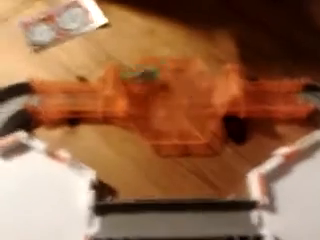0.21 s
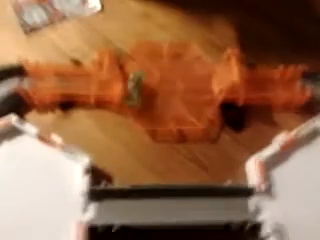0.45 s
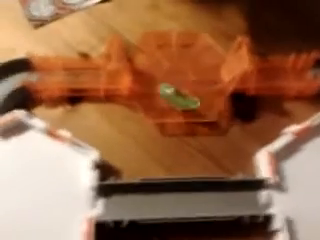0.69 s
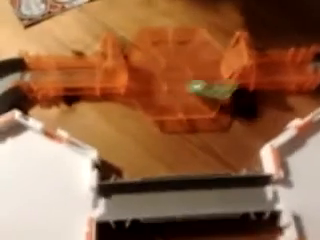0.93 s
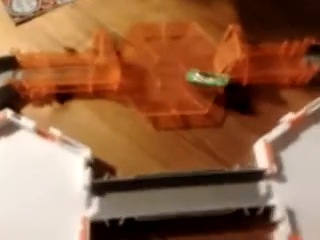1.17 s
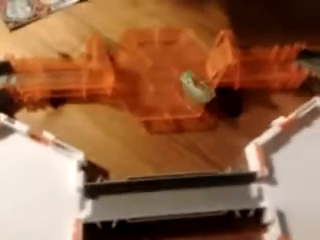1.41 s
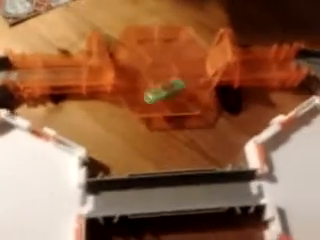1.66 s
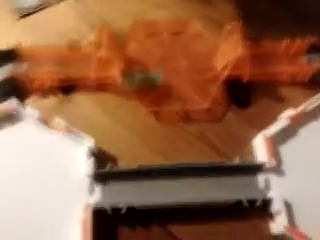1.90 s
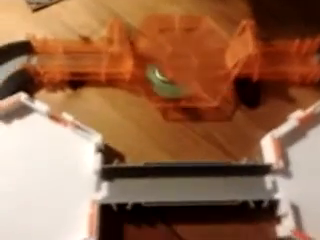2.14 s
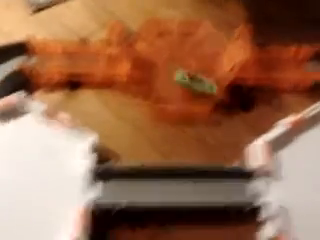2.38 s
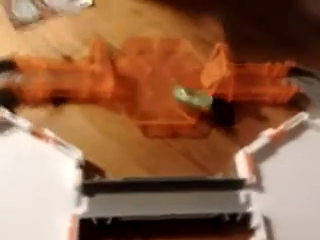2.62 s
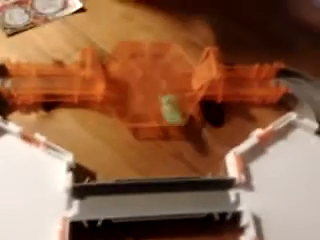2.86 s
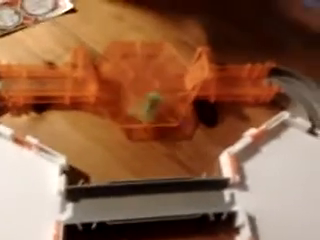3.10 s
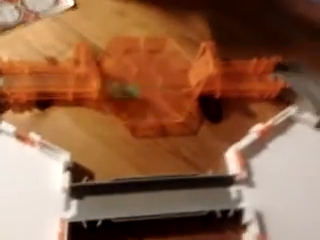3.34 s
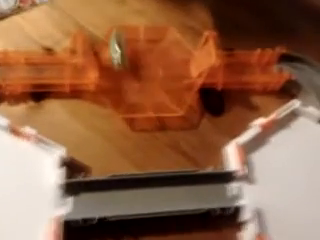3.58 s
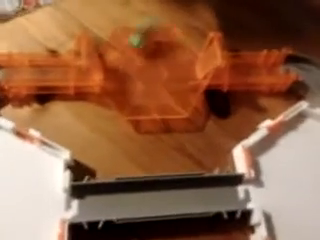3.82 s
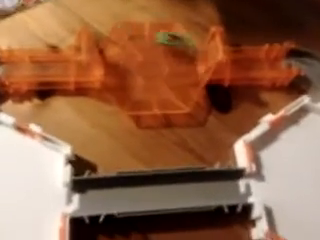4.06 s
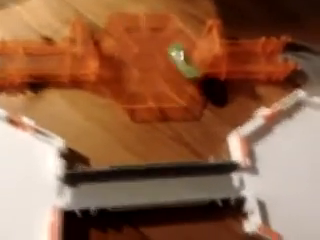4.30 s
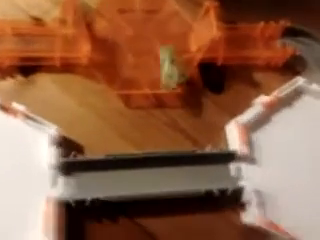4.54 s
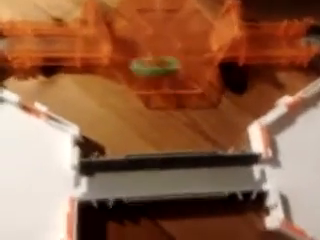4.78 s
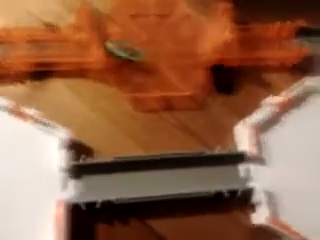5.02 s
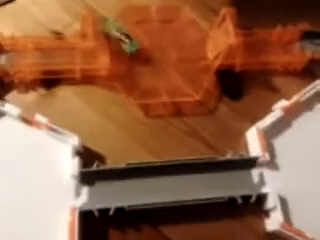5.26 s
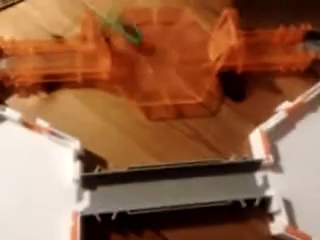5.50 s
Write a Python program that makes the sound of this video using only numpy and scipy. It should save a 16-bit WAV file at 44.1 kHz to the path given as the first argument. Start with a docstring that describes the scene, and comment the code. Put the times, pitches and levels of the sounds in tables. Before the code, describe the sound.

A tiny vibrating toy scurries in a hollow plastic arena on a wooden floor, heard close on a hand-held microphone with limited treble in a small room. A wavering low buzz near 130 Hz, a thin whirr and soft background noise run throughout. Above them, legs patter, tick and scrape irregularly with many dull plastic knocks. Sharp loud clacks land at 0.2, 0.4 and 0.58 s. From 1.0 to 1.7 s knocks crowd together, with a bright clack at 1.53. A faint dull handling rumble swells at 1.9. Lighter chatter follows, then a busy flurry at 2.75-3.0 and clacks near 2.66, 3.5 and 3.93. The hardest double crack comes at 4.42-4.46, followed by sparser pattering and clacks at 5.11, 5.31 and 5.46. Faint low hums come and go behind. The buzz is still running at the end, about 5.6 s.

```python
"""A small vibrating toy robot skitters around a plastic arena on a wooden floor, in a small room.
Its motor turns an uneven weight that drones through floor resonances; noisy contact forces make the legs
patter and scuff, and taps through a plastic filter make the body bump the panel and clack against walls.
Filtered noise gives a thin whirr and a steady background; faint hums come and go behind, and the hand-held
microphone is nudged once with a dull rumble."""
import sys
import numpy as np
from scipy import signal
from scipy.fft import rfft, irfft, next_fast_len
from scipy.io import wavfile
from scipy.ndimage import map_coordinates

SR = 44100
rng = np.random.default_rng(int(sys.argv[2]) if len(sys.argv) > 2 else 0)


def bounce(signal):
    """Save signal as a 16-bit WAV file at the path given by the first command-line argument."""
    frames = np.transpose(np.atleast_2d(signal))
    limited = np.clip(frames, -1, 1)
    pcm = np.round(limited * 32767).astype(np.int16)
    wavfile.write(sys.argv[1], SR, pcm)


N = 248283
T = np.arange(N) / SR  # time axis, s


def amp(db):
    """Decibels to gain."""
    return 10 ** (np.asarray(db) / 20)


def unit(x):
    """Scale to rms 1."""
    return x / np.sqrt(np.mean(x ** 2) + 1e-20)


def along(points, hz):
    """Read (Hz, value) points on a log frequency axis."""
    f, v = np.transpose(points)
    return np.interp(np.log(hz + 1), np.log(f + 1), v)


def curve(rows):
    """One value per sample from (s, value) rows."""
    return np.interp(T, *np.transpose(rows))


def wobble(rate):
    """A smooth random curve, rate knots a second."""
    return map_coordinates(rng.standard_normal(int(N * rate / SR) + 4), [T * rate])


def filtered(x, response):
    """Filter x by a response of frequency."""
    m = next_fast_len(len(x) + SR // 2)
    spectrum = rfft(x, m) * response(np.fft.rfftfreq(m, 1 / SR))
    return irfft(spectrum, m)[:len(x)]


def add(out, s, sound):
    """Mix a sound in at s seconds."""
    part = out[round(s * SR):][:len(sound)]
    part += sound[:len(part)]


def peak(hz, centre, width):
    """Shape of one resonance, 1 at its centre."""
    return 1 / (1 + (2 * (hz - centre) / width) ** 2)


# broad colour of the plastic arena under a tap: f/Hz, relative level/dB
ARENA_COLOUR = [(60, -29), (200, -20), (720, -14), (860, -3.5), (1000, -1.5), (1250, -6.5), (1650, 2),
                (2000, 4), (2200, -5.5), (2800, -5), (3100, -13), (3900, -21), (4900, -24.5), (6800, -23.5),
                (7300, -24)]
# narrow resonances of its panels: f/Hz, width/Hz, lift/dB
PANEL_PEAKS = [(982, 60, 4.5), (1780, 39, 1.5), (2468, 26, 8), (3415, 210, 8.5), (3740, 52, 8),
               (4250, 200, 8)]


def plastic(thump_db, snap_db, notes, size=4096):
    """The arena's causal ring after one tap: flat blows thump, hard corners snap, each spot has its note."""
    hz = np.fft.rfftfreq(size, 1 / SR)
    db = along(ARENA_COLOUR, hz)
    db = db + sum(lift * peak(hz, f, width) for f, width, lift in PANEL_PEAKS + notes)
    tilt = [(500, .5 * thump_db), (1000, thump_db), (1800, 0), (3400, 0.17 * snap_db), (6000, 1.57 * snap_db)]
    db = db + along(tilt, hz)
    # fold the cepstrum forward for minimum phase, so the ring starts at the tap
    cepstrum = irfft(np.log(amp(db)))
    cepstrum[1:size // 2] *= 2
    cepstrum[size // 2 + 1:] = 0
    return irfft(np.exp(rfft(cepstrum)))


def shudder(t, crunch_db, crunch_t60, rattle_db, rattle_t60):
    """Force of one contact: a blow, a brief crunch, then the arena's loose joints rattle on."""
    crunch = amp(crunch_db - 60 * t / crunch_t60)
    rattle = amp(rattle_db - 60 * t / rattle_t60)
    force = rng.standard_normal(len(t)) * (crunch + rattle)
    force[0] += 1
    return force


def grains(size, per_s):
    """Force of many tiny separate contacts of unequal weight, rms 1."""
    weights = np.tanh(2 * rng.standard_normal(size))
    return unit(weights * (rng.random(size) < per_s / SR))


MOTOR_HZ, MOTOR_WAVER = 128.7, .05  # middle speed in turns a second, spread of its drift as a share


def motor(speed_hz, waver):
    """Running count of turns of the eccentric weight, whose speed drifts at random."""
    return np.cumsum(speed_hz * np.exp(waver * wobble(14))) / SR


def landings(turns, scatter, uneven_db, rattle_db):
    """Force of the robot's landings: one a turn, a little early or late (scatter in s) and of its own weight."""
    hops = np.flatnonzero(np.diff(np.floor(turns)))
    late, weight, side = rng.standard_normal((len(hops), 3)).T
    when = np.clip(hops + scatter * SR * late, 0, N - 1).astype(int)
    sizes = amp(uneven_db * np.minimum(weight, 1)) * np.sign(side)
    out = np.zeros(N + SR)
    t = np.arange(SR // 25) / SR
    for i, size in zip(when, sizes):
        out[i:i + len(t)] += size * shudder(t, -16, .009, rattle_db, .04)
    return out[:N]


# floor and arena resonances that the motor shakes: f/Hz, width/Hz, relative level/dB
BOARD_MODES = [(130.3, 11.8, -0.5), (183.8, 9.7, 1.5), (233.8, 21.3, 0), (358, 28, -3.5), (401, 22, -5.5),
               (474, 38, -5.5)]
# level of the low drone over time, before DRONE_GAIN_DB: t/s, level/dB
DRONE_LEVEL = [(0.0, -48), (1.02, -53), (1.05, -49.5), (1.91, -51.5), (1.93, -48), (2.26, -50), (4.19, -48),
               (4.22, -52), (5.63, -52.5)]
DRONE_GAIN_DB = -0.5


def drone(turns):
    """The weight and the uneven landings shake the low resonances of floor and arena."""
    shake = landings(turns, scatter=0.00087, uneven_db=5.5, rattle_db=-26.5)

    def boards(f):
        """Sum of band-pass resonances with alternating polarity."""
        return sum((-1) ** k * amp(db) * 1j * f * w / (c * c - f * f + 1j * f * w)
                   for k, (c, w, db) in enumerate(BOARD_MODES))

    rumble = amp(-3.5) * unit(filtered(shake, boards))
    tone = amp(-23) * np.sin(2 * np.pi * turns)
    return amp(curve(DRONE_LEVEL) + DRONE_GAIN_DB) * (rumble + tone)


# how hard the robot patters, before PATTER_GAIN_DB; higher where it is caught in a corner: t/s, level/dB
PATTER_LEVEL = [(0.0, -41), (0.27, -51), (0.5, -46), (0.8, -52), (0.95, -50.5), (1.1, -45.5), (1.54, -49.5),
                (1.9, -47), (2.14, -43), (2.39, -46), (2.74, -46.5), (2.9, -42), (3.2, -43), (3.62, -52),
                (3.89, -47), (4.17, -40.5), (4.34, -51.5), (4.66, -52), (4.9, -47), (5.31, -50),
                (5.63, -54)]
PATTER_GAIN_DB, PATTER_SWAY_DB, SWAYS_PER_S = -4, 1, 14  # the gait is never steady
UPSET_DB, UPSET_MOST_DB = -13.5, -39.5  # extra hopping after a blow: level relative to it, upper limit
SETTLE_S = 0.046  # time constant of calming down


def agitation(hits):
    """Strength of the hopping: a swaying gait, stirred up by every blow and settling again."""
    sway_db = PATTER_SWAY_DB * np.tanh(wobble(SWAYS_PER_S))
    power = amp(curve(PATTER_LEVEL) + PATTER_GAIN_DB + sway_db) ** 2
    settling = np.exp(-T[:SR // 3] / SETTLE_S)
    for s, db in hits:
        add(power, s, (amp(min(db + UPSET_DB, UPSET_MOST_DB)) * settling) ** 2)
    return np.sqrt(power)


HOP_REBOUND_DB = 2.5  # second leg, relative to the first


def hop_force(t):
    """One leg lands, and a second follows within a few milliseconds."""
    force = shudder(t, crunch_db=-17, crunch_t60=0.02, rattle_db=-24, rattle_t60=0.05)
    force[int(rng.uniform(.002, .005) * SR)] += amp(HOP_REBOUND_DB)
    return force


HOP_SHARE, HOP_UNEVEN_DB = 0.36, 2.5  # chance that a turn ends in a real hop, largest lift or cut of its weight
HOP_NOTE_HZ, HOP_NOTE_SPREAD = 1783, 0.36  # middle note of the struck spots, log-frequency spread
HOP_NOTE_WIDTH_HZ, HOP_NOTE_DB = 170, 12.5
EDGE_HZ, EDGE_WIDTH_HZ = 4300, 1300  # hard plastic edge, shared by legs and bumps
BUZZ_DB = -4  # light drumming of the legs, relative to the hops


def patter(turns, hits):
    """The robot hops on some turns, each on a spot with its own note, over a light drumming of the legs."""
    starts = np.flatnonzero(np.diff(np.floor(turns))) / SR
    chance = rng.random(len(starts))
    traits = rng.standard_normal((len(starts), 4))
    hops = np.zeros(N)
    for s, luck, (late, weight, spot, thump) in zip(starts, chance, traits):
        if luck >= HOP_SHARE:
            continue
        note = (HOP_NOTE_HZ * np.exp(HOP_NOTE_SPREAD * spot), HOP_NOTE_WIDTH_HZ, HOP_NOTE_DB)
        ring = plastic(3.8 + 3 * thump, -7.5, [note, (EDGE_HZ, EDGE_WIDTH_HZ, 3)], size=1024)
        force = hop_force(np.arange(SR // 40) / SR)
        hop = unit(signal.fftconvolve(force, ring))
        add(hops, abs(s + .001 * late), amp(HOP_UNEVEN_DB * np.tanh(weight)) * hop)
    legs = landings(turns, scatter=0.001, uneven_db=3, rattle_db=-17)
    ring = plastic(thump_db=7.5, snap_db=-9, notes=[(EDGE_HZ, EDGE_WIDTH_HZ, 4)])
    buzz = signal.fftconvolve(legs, ring)[:N]
    return agitation(hits) * (unit(hops) + amp(BUZZ_DB) * unit(buzz))


# bright colour of the scuffing legs, also lent to the whirr: f/Hz, relative level/dB
LEG_COLOUR = [(1500, -16.5), (2600, 2), (4200, 1.5), (5300, -4.5), (6800, -0.5), (7400, -5.5)]


def leg_colour(force):
    """Noise through the bright band of the legs, rms 1."""
    return unit(filtered(force, lambda hz: amp(along(LEG_COLOUR, hz))))


# a leg or the nose catches and scrapes along the plastic: t/s, level/dB
SCRAPE_STROKES = [(0.302, -46), (0.475, -42), (1.21, -43), (1.257, -45.5), (1.359, -48), (1.412, -49),
                  (1.641, -40), (1.979, -56), (2.056, -47), (2.599, -46.5), (2.652, -52), (2.709, -48),
                  (3.039, -41.5), (3.493, -55), (3.983, -40), (4.037, -41), (4.111, -42.5), (4.3, -43.5),
                  (4.9, -62), (4.999, -44), (5.098, -55), (5.165, -47.5)]
SCRAPE_RISE_S, SCRAPE_FALL_S = 0.0087, 0.0097
SCUFF_DB, SCUFF_FOLLOWS = -55.5, 0.99  # level at average patter, dB per dB of patter
SCUFF_ROUGH_DB, SCUFF_CATCHES_PER_S = 9, 320  # the legs grip and slip at an uneven pace
SLIDE_DB, SLIDE_MOST_DB = -11.5, -38.5  # slide along the wall: level relative to its blow, upper limit


def scuff(effort_db, hits, before=0.0047, after=0.0071):
    """Legs tick and scrape in short bright spurts; the body slides just before and after each knock."""
    catch_db = 3.5 * np.tanh(1.3 * wobble(45))
    spurts = amp(SCUFF_DB + SCUFF_FOLLOWS * effort_db) * unit(amp(catch_db))
    strokes = [(s, min(db + SLIDE_DB, SLIDE_MOST_DB), before, after) for s, db in hits]
    strokes += [(s, db, SCRAPE_RISE_S, SCRAPE_FALL_S) for s, db in SCRAPE_STROKES]
    slides = np.zeros(N)
    for s, db, rise, fall in strokes:
        span = slice(max(0, int((s - .05) * SR)), int((s + .06) * SR))
        t = T[span] - s
        slides[span] += amp(db) * np.exp(-(t / np.where(t < 0, rise, fall)) ** 2)
    roughness = amp(SCUFF_ROUGH_DB * np.tanh(wobble(SCUFF_CATCHES_PER_S)))
    ticks = grains(N, per_s=3400) * roughness
    return spurts * leg_colour(ticks) + slides * leg_colour(grains(N, per_s=2500))


def whirr():
    """The motor's brushes hiss thinly and evenly under everything."""
    return amp(-62.5) * leg_colour(rng.standard_normal(N))


# colour of the steady background noise: f/Hz, relative level/dB
NOISE_COLOUR = [(15, -33), (25, -20), (71, -13), (211, -20.5), (627, -12), (984, -12.5), (1250, -12.5),
                (1960, -21.5), (2310, -17.5), (2480, -29), (7200, -60), (9360, -35.5), (15800, -120)]


def background_noise():
    """Steady background noise, shaped by its spectrum."""
    return amp(-56.0) * unit(filtered(rng.standard_normal(N), lambda hz: amp(along(NOISE_COLOUR, hz))))


def blow(db, rebound_db, ring, rattle_db, linger_db, low_hz=3800):
    """The body hits the plastic and rebounds a few milliseconds later; db is the level of the first 10 ms."""
    t = np.arange(SR // 6) / SR
    force = shudder(t, crunch_db=-19, crunch_t60=0.01, rattle_db=rattle_db, rattle_t60=0.051)
    rebound = shudder(t, crunch_db=-25, crunch_t60=0.01, rattle_db=-22, rattle_t60=0.045)
    lag = int(rng.uniform(0.0038, .0048) * SR)
    force[lag:] += 2 * amp(rebound_db) * rebound[:-lag]
    # the whole arena goes on rattling, with softened treble
    loose = signal.lfilter(*signal.butter(2, low_hz, fs=SR), grains(len(t), per_s=470))
    force += loose * amp(linger_db - 60 * t / 0.18)
    sound = signal.fftconvolve(force, ring)
    return amp(db) * sound / np.std(sound[:SR // 100])


# bumps on the arena's flat panel: t/s, level/dB, panel thump at 1 kHz/dB, hard plastic edge/dB
BUMP_HITS = [(0.041, -29.5, 4, 5.5), (0.135, -46, 0, 2), (0.216, -34.5, -3, -4), (0.409, -28.5, -1.5, 2.5),
             (0.516, -36.5, -7.5, 2), (0.542, -36, 6.5, -6), (0.6, -34.5, 16.5, -5),
             (0.626, -39.5, 6.5, -1), (0.638, -36.5, 6, 2.5), (0.686, -33, 2.5, 3),
             (0.705, -37.5, 2.5, 3.5), (0.812, -37.5, 6, 1), (0.859, -34.5, 6.5, 0),
             (0.88, -30.5, 1.5, 3.5), (1.002, -41.5, 1.5, -6), (1.03, -41, 4, -3.5), (1.0575, -27.5, 0, 3),
             (1.074, -35.5, -3, 3.5), (1.082, -41, 3, 6), (1.098, -35.5, 6, 4), (1.115, -31.5, 0, 4),
             (1.147, -35, 2, 0.5), (1.175, -36.5, 0.5, -4), (1.203, -35, -11.5, -4), (1.241, -44, 0, 3),
             (1.255, -37.5, 4, -3), (1.284, -35, 6, 0), (1.306, -32, 3.5, 7), (1.357, -33, 9, -1),
             (1.364, -28, 6, 2), (1.42, -32.5, 2, -2), (1.43, -34.5, -2, -2), (1.45, -34, -4, 5),
             (1.49, -32.5, 3.5, 3), (1.521, -47, 3, -8.5), (1.556, -36, 3, 4), (1.585, -38.5, -2, 3),
             (1.596, -28, 1, 6.5), (1.641, -43, 6, -2), (1.65, -27, 9, 5), (1.666, -28, 3, 12.5),
             (1.687, -32.5, 2.5, 7), (1.708, -31.5, 6.5, 9.5), (1.77, -44, 11, 2), (1.837, -36.5, 20, -14),
             (1.85, -38.5, 3, 8), (1.925, -39, 11, 0), (1.94, -38.5, 4, 0), (1.96, -40, 6, -1),
             (1.979, -39, 4, -1), (1.995, -40.5, -1, 1), (2.005, -33.5, 7.5, 2), (2.053, -36, 3, 15),
             (2.109, -46, -3, 10), (2.151, -33.5, 17, 1), (2.159, -42.5, 3, -11), (2.179, -39.5, 6, 2),
             (2.204, -46.5, 8, 8), (2.238, -47, 16, -5), (2.292, -40.5, 17, 4), (2.307, -37.5, 2.5, -8),
             (2.343, -47.5, 12, -1), (2.43, -46.5, 0, -3), (2.557, -40.5, -0.5, 9), (2.583, -39, 5, 0),
             (2.599, -40.5, -6, 3), (2.613, -38, 0, -1), (2.649, -35.5, 0, 1), (2.68, -36.5, 1, -1),
             (2.705, -39.5, -7, 9), (2.774, -30.5, 2.5, 7), (2.793, -32.5, -2, 5), (2.804, -33, -2, 6),
             (2.831, -29.5, 2, 9.5), (2.86, -30.5, 7, 9), (2.878, -29, 3, 3), (2.9, -33, 2, 11),
             (2.93, -35.5, -7, 1), (2.954, -31.5, -0.5, 5), (2.973, -35, 1, 7), (3.008, -45, -1, 9),
             (3.021, -44, 1, 5), (3.05, -31, 1.5, -5), (3.088, -42, 4, 5), (3.109, -38, -12, 2),
             (3.14, -39.5, -4, 2), (3.189, -44, -8, 0), (3.209, -43, 8, 11), (3.24, -39.5, 4, 3),
             (3.273, -35.5, -15, 3), (3.327, -47, 3, 13), (3.352, -37, 6.5, 0), (3.414, -40, 4, -4),
             (3.43, -34, 0, -4), (3.509, -33.5, 0, -3), (3.611, -35.5, 3, 2), (3.654, -34.5, -2, 2),
             (3.664, -32, 5.5, 12.5), (3.719, -37.5, 6.5, 11), (3.785, -42.5, 15, 2), (3.826, -45, 7, 0),
             (3.849, -37.5, 4.5, -9), (3.867, -39.5, 2.5, 7), (3.92, -36.5, -0.5, 7.5), (3.978, -39, 1, 1),
             (3.995, -42.5, 3, -1.5), (4.039, -30.5, -1, 6), (4.052, -39.5, -7.5, -5), (4.113, -42, -16, 2),
             (4.137, -39, 3, 2), (4.15, -38.5, 2, 0), (4.164, -40, -8, -3), (4.196, -42, -1, -8.5),
             (4.214, -42.5, 1, -3.5), (4.238, -36.5, 2.5, 1), (4.322, -46.5, 9, -5), (4.381, -34, -1, -6),
             (4.4, -43, 5, -4.5), (4.608, -37.5, 4.5, -5.5), (4.718, -45, -20.5, 9.5),
             (4.819, -29.5, 6, 5.5), (4.892, -37, 13, -1), (4.904, -41.5, 5, -11), (4.985, -41.5, -8, 4.5),
             (5.003, -40, -1, 2), (5.097, -33.5, 14, -4.5), (5.162, -33, -1, 4), (5.213, -39.5, 10, 8),
             (5.235, -39, 9, -4), (5.327, -37, 7, -8), (5.406, -43, 1, 14)]


def bumps():
    """Duller, cleaner knocks on the flat panel; the colour depends on the spot that is struck."""
    out = np.zeros(N)
    for s, db, thump_db, edge_db in BUMP_HITS:
        ring = plastic(thump_db, snap_db=-1, notes=[(EDGE_HZ, EDGE_WIDTH_HZ, edge_db)])
        add(out, s, blow(db, rebound_db=-12, ring=ring, rattle_db=-21, linger_db=-32))
    return out


# faint background hums: start t/s, end t/s, start f/Hz, end f/Hz, width/Hz, roughness (0-1), level/dB
HUM_TONES = [(0.148, 0.434, 523, 516, 38, 0.4, -58), (1.908, 2.19, 241.8, 237, 12.4, 0.11, -53.5),
             (2.14, 2.355, 512, 531, 52, 0.54, -56), (2.74, 2.92, 391, 399, 5.6, 0.15, -59),
             (3.98, 4.193, 394, 391, 6, 0.2, -58.5), (4.7, 4.98, 191.8, 189.4, 6.2, .03, -57),
             (4.962, 5.447, 250, 244, 30, 0.9, -57), (5.43, 5.626, 164.4, 139, 20, 0.3, -55.5)]


def hums(fade):
    """Soft low tones in the background, each partly blurred into a narrow band of noise; fade in s."""
    out = np.zeros(N)
    for start, end, from_hz, to_hz, width, rough, db in HUM_TONES:
        phase = 2 * np.pi * np.cumsum(np.interp(T, [start, end], [from_hz, to_hz])) / SR
        gate = np.clip(np.minimum(T - start, end - T) / fade + .5, 0, 1)
        blur = unit(wobble(2 * width) * np.sin(phase) + wobble(2 * width) * np.cos(phase))
        rough = np.clip(rough, 0, 1)  # share of the power that is noise
        out += amp(db) * gate * (np.sqrt(1 - rough) * unit(np.sin(phase)) + np.sqrt(rough) * blur)
    return out


# the hard body clacks against a wall or corner: t/s, level/dB, panel thump at 1 kHz/dB,
# corner snap/dB (scaled by 0.17 at 3.4 kHz, 1.57 at 6 kHz), rebound/dB (before blow() doubles its gain),
# note of the struck spot f/Hz, its width/Hz, its lift/dB, arena rattle afterwards/dB
CLACK_HITS = [(0.199, -17.5, 3.5, 15.5, -17, 1650, 700, 4.5, -27.5),
              (0.4, -21, -5.5, 8, -6, 3020, 300, 16, -31),
              (0.5805, -15.5, -12, 3.5, -1, 3320, 600, 3, -26.5),
              (0.801, -40.5, 7, 28.5, -11, 3500, 390, 8, -34),
              (1.273, -32.5, -3, 10, -16, 3560, 390, 4, -33), (1.532, -21, 10, 14, -9, 3600, 1290, 24, -22),
              (2.664, -29.5, 6, 7, 2, 4070, 1100, 20, -21),
              (3.4964, -29.5, 10, 11.5, -11, 2030, 384, 6, -30),
              (3.5295, -24, 5.5, 9.5, -4, 3920, 900, 18.5, -37),
              (3.927, -25.5, 2.5, 4, -11, 1870, 387, 3.5, -30),
              (4.4232, -17.5, -10.5, 6, -12, 1790, 120, 10.5, -34),
              (4.463, -15, -13.5, 9.5, 4.5, 2950, 300, 9, -21.5),
              (5.1148, -21.5, -16, 6, -16, 2510, 910, 1, -43),
              (5.309, -21, -9, 8, -28, 1850, 200, 0.5, -22),
              (5.4554, -21.5, -4, 9, -26, 1860, 390, 3.5, -29)]


def clacks():
    """Hard, bright hits on walls and corners; each spot rings with its own note, and the joints rattle."""
    out = np.zeros(N)
    for s, db, thump_db, snap_db, rebound_db, note_hz, width_hz, note_db, linger_db in CLACK_HITS:
        ring = plastic(thump_db, snap_db, [(note_hz, width_hz, note_db)])
        add(out, s, blow(db, rebound_db, ring, rattle_db=-13.5, linger_db=linger_db))
    return out


def nudge(low_hz, db):
    """The hand shifts on the microphone's case: a dull rumble of low-passed noise, swelling once."""
    swell = np.exp(-((T - 1.91) / .055) ** 2)
    rumble = filtered(rng.standard_normal(N), lambda hz: hz / (1 + (hz / low_hz) ** 4))
    return amp(db) * swell * unit(rumble)


# reverberation of the room: f/Hz, t60/s
ROOM_DECAY = [(300, 0.73), (1000, 0.41), (2500, 1), (7000, 0.55)]


def room(x):
    """Diffuse tails of decaying noise, a new one each quarter second as robot and microphone move."""
    out = np.zeros(N + SR)
    for i in range(0, N, SR // 4):
        hz, t, z = signal.stft(rng.standard_normal(SR // 2), SR, nperseg=256)
        decay = amp(-60 * t / along(ROOM_DECAY, hz)[:, None])
        onset = 1 - np.exp(-t / 0.00069)
        tail = signal.istft(z * decay * onset, SR, nperseg=256)[1]
        wet = signal.fftconvolve(x[i:i + SR // 4], tail / np.linalg.norm(tail))
        out[i:i + len(wet)] += wet
    return out[:N]


def scene():
    """Mix the robot, its room and the background."""
    turns = motor(MOTOR_HZ, MOTOR_WAVER)
    patter_db = curve(PATTER_LEVEL)
    effort_db = patter_db - patter_db.mean()
    hits = [row[:2] for row in CLACK_HITS] + [row[:2] for row in BUMP_HITS]
    robot = clacks() + bumps() + patter(turns, hits) + scuff(effort_db, hits) + whirr()
    background = background_noise() + hums(fade=0.0098) + nudge(low_hz=65, db=-52.0)
    return (robot + amp(-20.0) * room(robot) + drone(turns) + background)[None]


TOP_HZ = 7230  # upper edge of the microphone's band


def record(dry):
    """The microphone's band ends steeply."""
    return np.array([filtered(x, lambda hz: 1 / np.sqrt(1 + (hz / TOP_HZ) ** 110)) for x in dry])


dry = scene()
out = record(dry)
bounce(out)
```